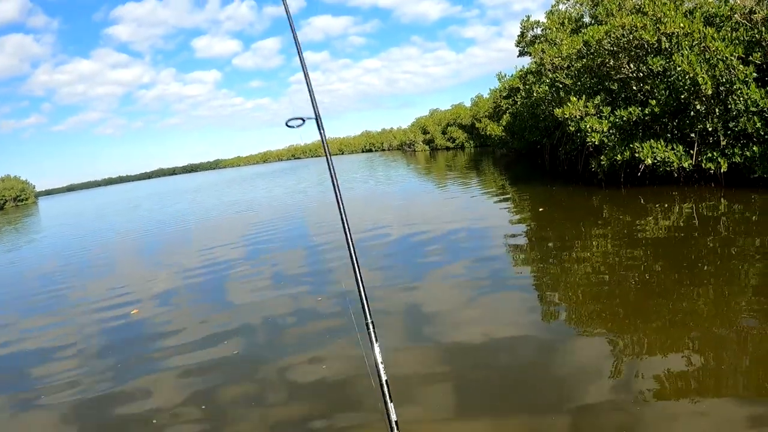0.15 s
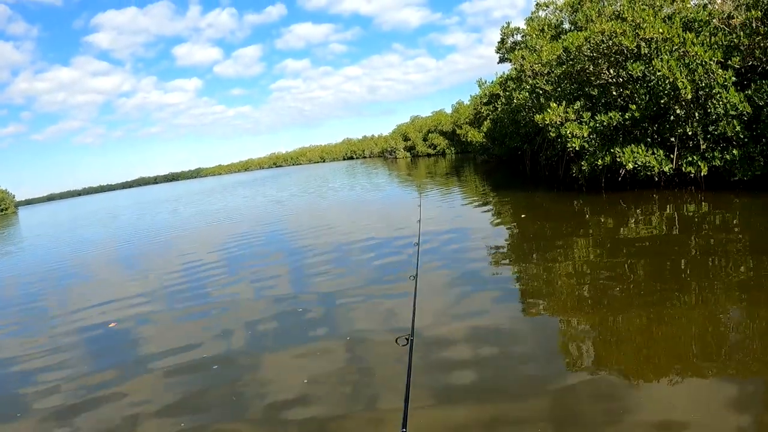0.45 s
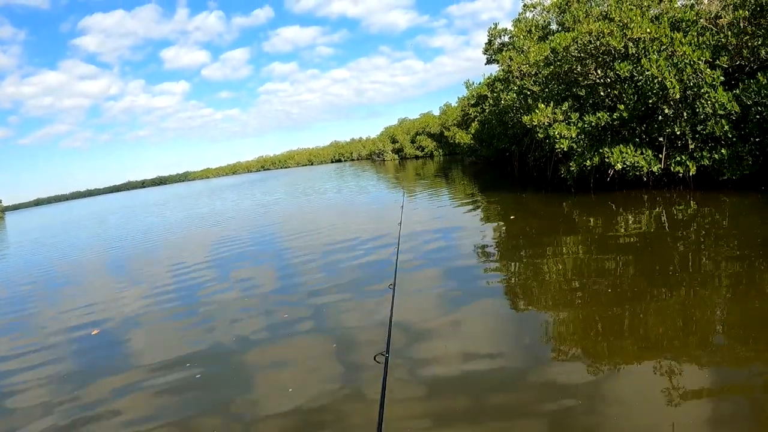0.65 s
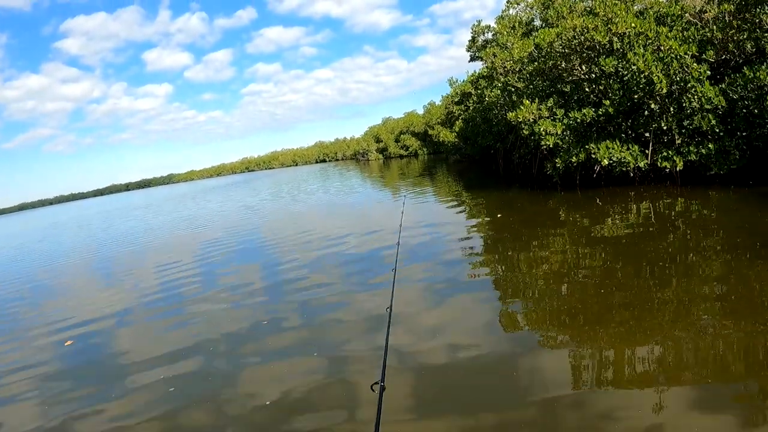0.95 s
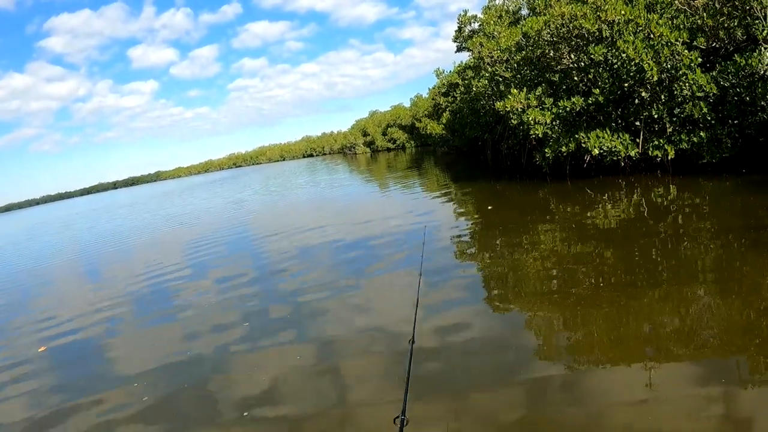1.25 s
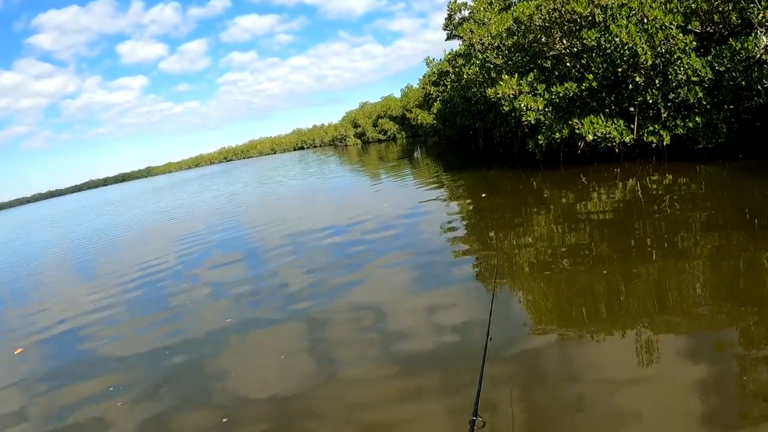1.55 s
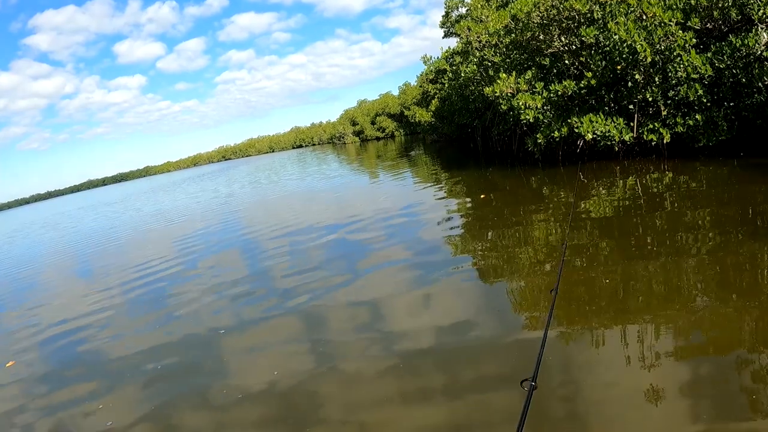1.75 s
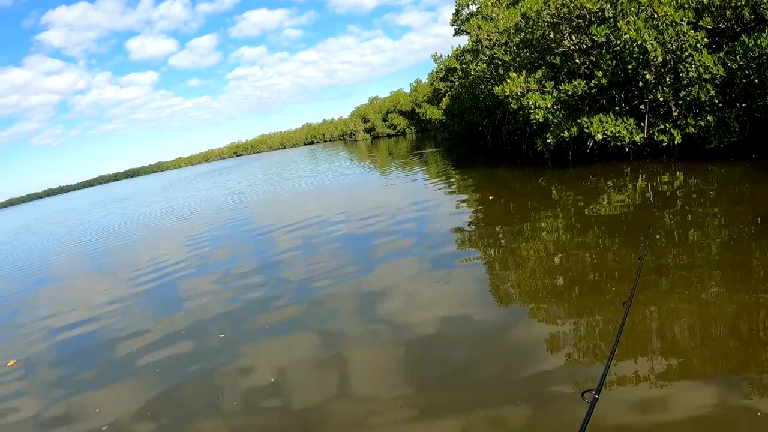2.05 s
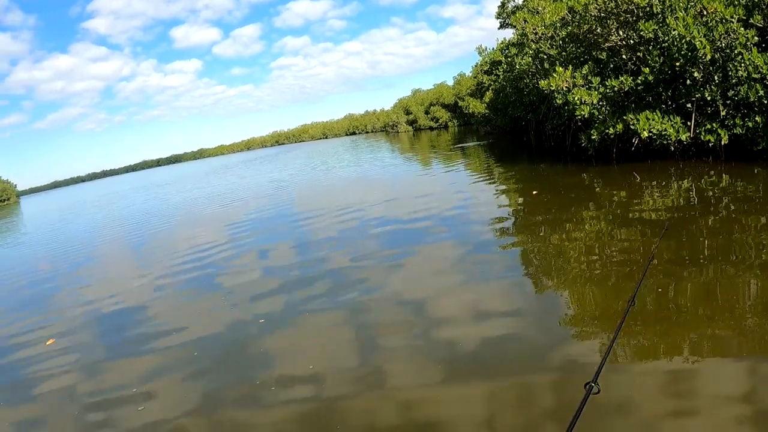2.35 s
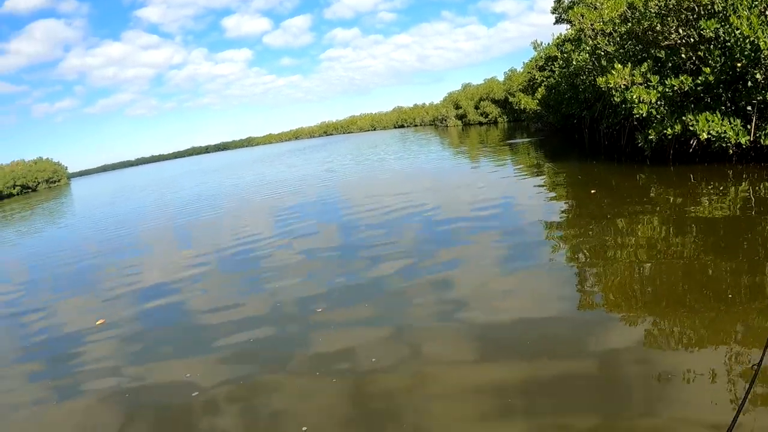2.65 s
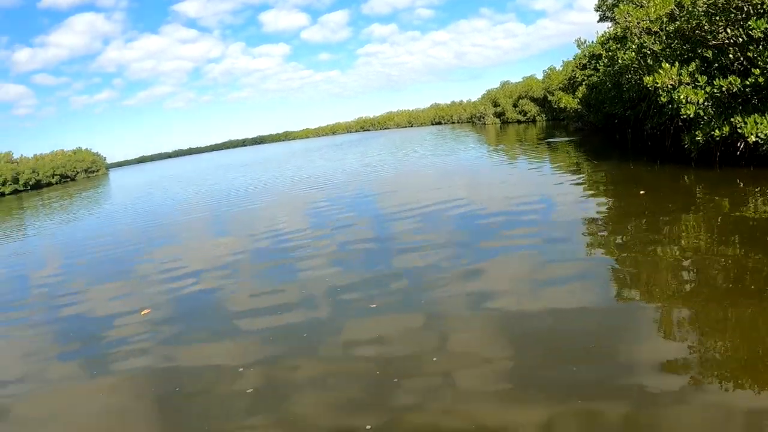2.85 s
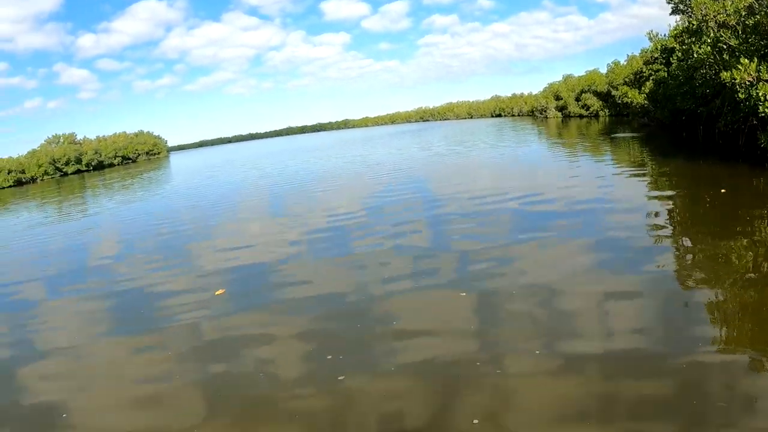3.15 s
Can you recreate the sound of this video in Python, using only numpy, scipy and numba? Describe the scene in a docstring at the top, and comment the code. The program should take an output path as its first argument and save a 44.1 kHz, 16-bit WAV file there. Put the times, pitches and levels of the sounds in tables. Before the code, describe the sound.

Fishing cast: swishing rod, hissing line, clicking reel, and water plopping and gulping close by

```python
"""Calm shallow water, an angler standing in it, the microphone worn on the body and so close to rod and reel.
The cast: the rod whistles and the air rushes (moving noise bands), line hisses off the spool and later swishes
as it tightens (paired resonances), the bail snaps shut and the tackle clicks (noise clicks that ring the metal),
then the reel starts to turn (a coloured whirr).
Water laps, plops and gulps round the legs (rising sines over coloured noise); light air rumbles on the microphone."""
import sys
import numpy as np
from scipy import signal
from scipy.fft import rfft, irfft
from scipy.io import wavfile
from scipy.ndimage import uniform_filter1d
from numba import njit

SR = 44100
rng = np.random.default_rng(int(sys.argv[2]) if len(sys.argv) > 2 else 0)


def wav_out(sig):
    """Save sig, one row per channel (or a flat mono array), as 16-bit PCM at SR to the path in sys.argv[1]."""
    wavfile.write(sys.argv[1], SR, np.round(np.clip(np.atleast_2d(sig).T, -1, 1) * 32767).astype(np.int16))


N = 145530  # length in samples

# Whistle of the swinging rod. Each row: time in seconds, pitch in Hz, level in dB.
ROD_WHISTLE = [(.12, 2100, -105), (.175, 2450, -70), (.21, 2820, -55), (.25, 3900, -49), (.285, 3600, -53),
               (.31, 3480, -57), (.34, 3200, -105)]
WHISTLE_WIDTH_HZ, WHISTLE_FLUTTER_DB = 600, 3
# Air rushing past rod and arm. Each row: time in seconds, level in dB.
AIR_RUSH = [(.14, -77), (.22, -52.5), (.28, -51.5), (.33, -51.5), (.38, -53.5), (.5, -58), (.65, -69),
            (.9, -70)]
# Spectrum of that rush. Each row: frequency in Hz, relative density in dB per Hz.
RUSH_SPECTRUM = [(150, 10), (400, 4.5), (1300, 4), (2500, -4.5), (4000, -6.5), (5300, -3), (7500, -9.5),
                 (16000, -27)]

# Hiss of the line: running off the spool, then a swish as it tightens.
# Each row: time in seconds, middle of the two resonances in Hz, filter width in Hz, level in dB.
LINE_HISS = [(.22, 11000, 8850, -84), (.27, 11500, 9000, -57), (.34, 12700, 7500, -54.5),
             (.5, 12400, 7000, -58.5), (.68, 11300, 5640, -58), (.82, 9900, 4630, -57.5),
             (.96, 8660, 2700, -60.5), (1.14, 7340, 1900, -61), (1.23, 6940, 2200, -67.5),
             (1.28, 8800, 4500, -64.5), (1.47, 7500, 5000, -72), (1.6, 5100, 5200, -64.5),
             (1.8, 4120, 3600, -80.5), (2.17, 4470, 2500, -90), (2.28, 5560, 1700, -65.5),
             (2.42, 7000, 2500, -83)]
LINE_SPLIT = 1.14  # the resonances lie this ratio below and above the middle
LINE_FLUTTER_DB = 2
# Slack coils ticking off the spool
SLACK_START_S, SLACK_END_S, SLACK_PER_S = 1.258, 1.495, 60
SLACK_DB, SLACK_TICK_S = -55.5, 0.0022

# Sharp clicks of the tackle: reel, bail, line slapping a rod guide, a knock.
# Each row: start in seconds, body level in dB, middle level in dB, treble level in dB, decay in seconds.
TACKLE_CLICKS = [(.015, -57, -66, -77, 0.00099), (.047, -58.5, -62, -76, 0.0027),
                 (0.12, -40.5, -41.5, -49, 0.00056), (0.315, -49, -36, -39, 0.0033),
                 (1.466, -44, -56, -56, 0.0017), (1.523, -48, -38, -55, 0.00053),
                 (1.638, -49.5, -53.5, -55, 0.0052), (1.654, -47.5, -45, -59, 0.0046),
                 (1.882, -56, -55, -67, 0.0089), (1.896, -39.5, -40, -40, 0.0027),
                 (1.902, -48.5, -41, -52, .003), (1.911, -55, -48, -54, 0.0043),
                 (2.168, -55, -66, -74, 0.0018), (2.329, -45, -57, -68, 0.0019),
                 (2.58, -62, -54, -62, 0.0026), (2.596, -55.5, -73, -57, 0.0098),
                 (2.666, -54.5, -51.5, -63, 0.0035), (2.696, -55, -50, -54.5, 0.0015),
                 (2.732, -51.5, -54.5, -77, 0.0048), (2.767, -52.5, -48.5, -55, 0.0029),
                 (2.801, -51, -52, -59, 0.0019), (2.815, -64, -60, -55, 0.0018),
                 (3.12, -59, -60, -55, 0.0021)]
ATTACK_S = 0.00057  # shared by every short burst
# Ring of the reel's metal. Each row: pitch in Hz, relative level in dB, time to fall 60 dB in seconds.
METAL_MODES = [(1600, -11.5, 0.076), (1935, -12, 0.059), (5000, -14, 0.037)]
METAL_RING_DB = -26.5  # added to all the modes
# Dull taps of the hand on the rod grip.
# Each row: start in seconds, level in dB ahead of the dulling low-pass, centre in Hz.
GRIP_TAPS = [(0.781, -44.5, 700), (.917, -48.5, 1000), (1.997, -42, 610), (2.051, -50.5, 1110),
             (2.071, -46.5, 910), (2.089, -53, 1000), (2.131, -55, 1200), (2.355, -50.5, 876)]
TAP_DECAY_S, TAP_WIDTH_HZ = 0.0013, 680
# Light metal parts of the tackle. Each row: start in seconds, pitch in Hz, level in dB, decay in seconds.
TACKLE_PINGS = [(0.321, 2260, -41.5, 0.0082), (1.678, 5020, -65, .035), (1.68, 8460, -64, 0.029)]

# Whirr of the reel winding in. Each row: time in seconds, level in dB.
WHIRR_LEVEL = [(2.42, -73), (2.52, -65.5), (2.62, -66.5), (2.8, -65.5), (3.05, -70.5), (3.3, -68)]
# Spectrum of the gears. Each row: frequency in Hz, relative density in dB per Hz.
GEAR_SPECTRUM = [(800, -47), (2000, 8), (3000, -7.5), (4200, 3.5), (5500, -5), (8200, -1), (10000, -9),
                 (16000, -4.5)]
# Droplets during the winding; level relative to the whirr
DROPLET_HZ, DROPLET_RING_S, DROPLET_DB = 5195, 0.0026, -7

# Air bubbles in the water.
# Each row: start in seconds, first pitch in Hz, rise in octaves per second, ring in seconds,
# level in dB ahead of the wobble.
WATER_BUBBLES = [(.362, 1270, 20.6, 0.023, -41), (.4, 1700, 4.6, 0.008, -39.5), (.413, 950, 10, 0.01, -42),
                 (.43, 1190, 7.9, 0.012, -46.5), (.494, 1066, 10.6, .011, -48),
                 (.515, 1156, 8.9, .0099, -46.5), (.555, 1940, 5.1, 0.0055, -54),
                 (.608, 976, 9.7, .023, -50), (.684, 1290, 7.4, 0.0095, -47.5),
                 (.799, 2990, 3, .004, -46.5), (.815, 1674, 7.3, .01, -51), (.825, 3520, 3.4, 0.0028, -48),
                 (.838, 3600, 3, 0.0027, -43), (.857, 1120, 7, .0028, -48), (.876, 1720, 6, .008, -59),
                 (1.794, 2300, 22, 0.0094, -57), (1.829, 2450, 15, .006, -56),
                 (2.035, 2440, 8.4, 0.012, -57.5), (2.154, 2450, 8.7, 0.0036, -57.5),
                 (2.238, 2390, 8, 0.0056, -54.5), (2.26, 1264, 7.3, 0.0057, -47),
                 (2.264, 732, 3.5, .026, -50), (2.385, 367.5, 13.4, 0.022, -38.5),
                 (2.385, 675, 8, .012, -45), (2.386, 2065, 3.3, 0.0041, -44.5),
                 (2.407, 1226, 23, .02, -51.5), (2.41, 408, 25, 0.029, -35.5),
                 (2.432, 790, 21.4, .024, -45), (2.466, 1023, 19.6, 0.0087, -41),
                 (2.467, 1570, 13, 0.0039, -41), (2.476, 2076, 5, 0.016, -55),
                 (2.493, 213, 14.6, 0.026, -43), (2.618, 1550, 4.7, 0.013, -56.5),
                 (3.122, 2400, 4, .008, -57), (3.184, 4430, 3, .0028, -42.5), (3.194, 3700, 5.5, .004, -56)]
BUBBLE_ATTACK_S = 0.0015  # for a rise of 10 octaves per second
WOBBLE_OCTAVES, WOBBLE_DB, WOBBLE_PER_S = .022, 2, 300
# The splash as the biggest gulp closes
SPLASH_S, SPLASH_HZ, SPLASH_WIDTH_HZ, SPLASH_DECAY_S, SPLASH_DB = 2.467, 1290, 650, 0.016, -48
# Water lapping at the legs. Each row: time in seconds, reference level in dB for wash and fizz.
LAP_LEVEL = [(0, -64), (.3, -62.5), (.45, -56.5), (.62, -60), (1, -99), (1.15, -63.5), (1.32, -56),
             (1.45, -58), (1.55, -59.5), (1.72, -78), (1.85, -55.5), (1.93, -54), (2.05, -75),
             (2.35, -63.5), (2.5, -59.5), (2.7, -64.5), (3, -62.5), (3.3, -64)]
# Spectrum of the wash. Each row: frequency in Hz, relative density in dB per Hz.
WASH_SPECTRUM = [(200, -27), (450, -6), (900, 1), (1400, 0), (1800, -21), (3000, -11), (8000, -63)]
WASH_DB, WASH_SWAY_DB, WASH_SWAY_PER_S = -6.0, 2.7, 39.34
FIZZ_HZ, FIZZ_RING_S, FIZZ_DB = 1087, 0.019, -13

# Air on the microphone. Each row: frequency in Hz, relative density in dB per Hz.
RUMBLE_SPECTRUM = [(2, -18), (6, 4.5), (12, -1), (25, -17), (50, -18), (100, -25), (160, -32.5),
                   (300, -43.3), (600, -64.5), (2000, -95)]
RUMBLE_DB = -30.2
# Hiss of the open air. Each row: frequency in Hz, relative density in dB per Hz.
HISS_SPECTRUM = [(100, 0), (400, 0), (800, -6), (1350, -9), (1850, -17), (3000, -19.5), (8000, -23),
                 (16000, -25)]
HISS_DB = -64
TOP_HZ = 16050


def rod():
    """The tip sheds uneven eddies, whistling higher as it speeds up; the thicker parts only rush."""
    hz, db = curve(ROD_WHISTLE)
    flutter = undb(WHISTLE_FLUTTER_DB * walk(200))
    whistle = unit(band(hz, WHISTLE_WIDTH_HZ) * flutter)
    rush = undb(curve(AIR_RUSH)[0]) * noise(RUSH_SPECTRUM)
    return undb(db) * whistle + rush


def line():
    """Line hisses in two broad resonances that mostly sink, with later swishes; slack coils tick in between."""
    hz, width, db = curve(LINE_HISS)
    resonances = band(hz / LINE_SPLIT, width) + band(hz * LINE_SPLIT, width)
    hiss = undb(db) * unit(resonances * undb(LINE_FLUTTER_DB * walk(300)))
    times = np.arange(SLACK_START_S, SLACK_END_S, 1 / SLACK_PER_S)
    ticks = np.zeros(N)
    for start, (late, size) in zip(times, rng.standard_normal((100, 2))):
        # uneven by about a quarter of the spacing and by 2 dB
        ticks += burst(start + 0.23 * late / SLACK_PER_S, SLACK_TICK_S) * undb(2 * size)
    return hiss + undb(SLACK_DB) * ticks * band(9000, 8000)


def clicks_and_taps():
    """Short noise clicks in three bands ring the damped modes of the metal; the hand taps the grip."""
    body, middle, treble = band(1080, 2760), band(4550, 6400), band(8080, 4100)
    clicks = np.zeros(N)
    for start, body_db, middle_db, treble_db, decay in TACKLE_CLICKS:
        mix = undb(body_db) * body + undb(middle_db) * middle + undb(treble_db) * treble
        clicks += burst(start, decay) * mix
    ring = np.zeros(N)
    for hz, db, t60 in METAL_MODES:
        # the imaginary part of a one-pole complex filter is a decaying sine
        pole = np.exp((2j * np.pi * hz - np.log(1000) / t60) / SR)
        ring += undb(db) * signal.lfilter([1], [1, -pole], clicks + 1e-18).imag
    taps = sum(undb(db) * burst(start, TAP_DECAY_S) * band(hz, TAP_WIDTH_HZ) for start, db, hz in GRIP_TAPS)
    dull = signal.butter(2, 2500, fs=SR, output="sos")
    return clicks + undb(METAL_RING_DB) * ring + signal.sosfilt(dull, taps)


def pings():
    """Each small metal part rings on one decaying note."""
    t = np.arange(N) / SR
    return sum(undb(db) * burst(start, decay) * np.sin(2 * np.pi * hz * t)
               for start, hz, db, decay in TACKLE_PINGS)


def winding():
    """The gears whirr as coloured noise while droplets trickle and tick."""
    droplets = undb(DROPLET_DB) * fizz(DROPLET_HZ, DROPLET_RING_S, count=260)
    return undb(curve(WHIRR_LEVEL)[0]) * (noise(GEAR_SPECTRUM) + droplets)


def water():
    """Single plops and one small splash over an uneven wash full of tiny bubbles."""
    wash = noise(WASH_SPECTRUM) * undb(WASH_SWAY_DB * walk(WASH_SWAY_PER_S))
    tiny_bubbles = fizz(FIZZ_HZ, FIZZ_RING_S, count=300)
    lapping = undb(curve(LAP_LEVEL)[0]) * (undb(WASH_DB) * wash + undb(FIZZ_DB) * tiny_bubbles)
    splash = undb(SPLASH_DB) * burst(SPLASH_S, SPLASH_DECAY_S) * band(SPLASH_HZ, SPLASH_WIDTH_HZ)
    return ring_bubbles(WATER_BUBBLES) + splash + lapping


def ring_bubbles(rows):
    """Each bubble is a wobbling sine that rises as it nears the surface; fast risers swell more softly."""
    out = np.zeros(N + SR)
    bend = 2 ** (WOBBLE_OCTAVES * walk(WOBBLE_PER_S))
    swell = undb(WOBBLE_DB * walk(WOBBLE_PER_S))
    for start, hz, rise, ring, db in rows:
        t = np.arange(int(min(3 * ring, .2) * SR)) / SR
        at = int(start * SR) + np.arange(len(t))
        # the rise stops after 1.2 ring times
        pitch = hz * 2 ** (rise * np.minimum(t, 1.2 * ring)) * bend[at % N]
        attack = BUBBLE_ATTACK_S * (rise / 10) ** 1.5
        shape = np.minimum(t / attack, 1) * np.exp(-(t / ring) ** 1.5)
        tone = np.sin(2 * np.pi * np.cumsum(pitch) / SR)
        out[at] += undb(db) * shape * swell[at % N] * tone
    return out[:N]


def fizz(centre_hz, ring, count):
    """A scatter of tiny bubbles within an octave of one pitch, most of them faint; rms 1."""
    when, size, faintness = rng.random((count, 3)).T
    pitch = centre_hz * 2 ** (2 * size - 1)
    rows = [(w * N / SR, hz, 10, ring * centre_hz / hz, -20 * np.sqrt(faint))
            for w, hz, faint in zip(when, pitch, faintness)]
    return unit(ring_bubbles(rows))


def air():
    """A low steady rumble under a faint smooth hiss, both coloured noise."""
    return undb(RUMBLE_DB) * noise(RUMBLE_SPECTRUM) + undb(HISS_DB) * noise(HISS_SPECTRUM)


def undb(db):
    """Amplitude factor for a level in dB."""
    return 10 ** (np.asarray(db) / 20)


def unit(x):
    """Scale to rms 1."""
    return x / np.sqrt(np.mean(x ** 2))


def curve(rows):
    """The columns of a timed table, sample by sample."""
    rows = np.array(rows, float)
    return [np.interp(np.arange(N) / SR, rows[:, 0], col) for col in rows.T[1:]]


def noise(spectrum):
    """Noise of rms 1 with the given spectrum, joined up along log frequency."""
    hz, db = np.array(spectrum, float).T
    f = np.maximum(np.fft.rfftfreq(N, 1 / SR), 1)
    gain = undb(np.interp(np.log(f), np.log(hz), db))
    return unit(irfft(rfft(rng.standard_normal(N)) * gain, N))


def walk(rate):
    """Smoothed random steps, rate of them per second, with rms 1."""
    k = max(int(SR / rate), 1)
    steps = np.repeat(rng.standard_normal(N // k + 1), k)
    return unit(uniform_filter1d(uniform_filter1d(steps, k), k)[:N])


@njit
def svf(x, hz, width):
    """State-variable band-pass whose centre and width may move."""
    y, b, l = np.empty(len(x)), 0., 0.  # b and l: band and low states
    for i in range(len(x)):
        f = min(hz[i], .45 * SR)
        g = np.tan(np.pi * f / SR)
        k = 2 * np.pi * width[i] / SR / np.sin(2 * np.pi * f / SR)
        v = (b + g * (x[i] - l)) / (1 + g * (g + k))
        b, l, y[i] = 2 * v - b, l + 2 * g * v, k * v
    return y


def band(hz, width):
    """Noise of rms 1 in a steep, movable resonance: two equal band-passes in a row."""
    hz, width = hz * np.ones(N), width * np.ones(N)
    source = rng.standard_normal(N) / np.sqrt(width)  # steady strength as the width moves
    return unit(svf(svf(source, hz, width), hz, width))


def burst(start, decay):
    """Envelope with a quick attack and an exponential release."""
    out, i = np.zeros(N), int(start * SR)
    t = np.arange(min(SR // 5, N - i)) / SR
    out[i:i + len(t)] = np.minimum(t / ATTACK_S, np.exp((ATTACK_S - t) / decay))
    return out


def scene():
    """Tackle near the microphone, water round the legs and air, summed to one channel."""
    tackle = rod() + line() + clicks_and_taps() + pings() + winding()
    return (tackle + water() + air())[None]


def record(dry):
    """The camera cuts the top with a steep low-pass."""
    return signal.sosfilt(signal.ellip(10, .2, 60, TOP_HZ, fs=SR, output="sos"), dry)


dry = scene()
out = record(dry)
wav_out(out)
```